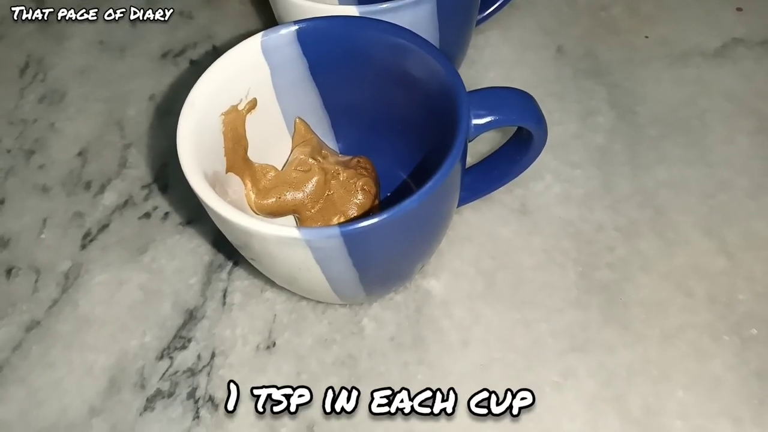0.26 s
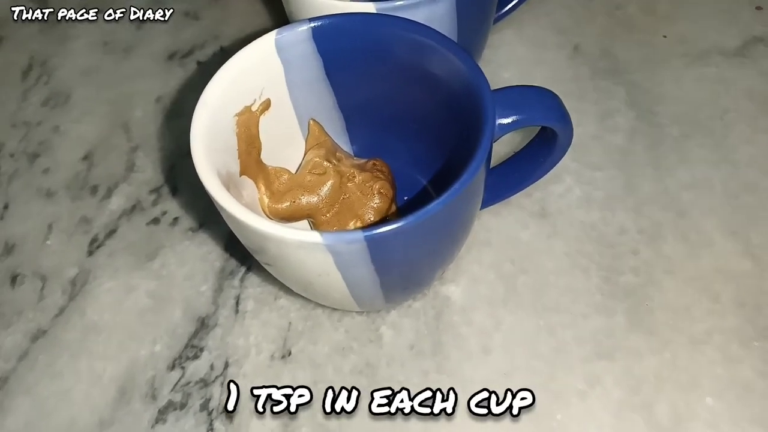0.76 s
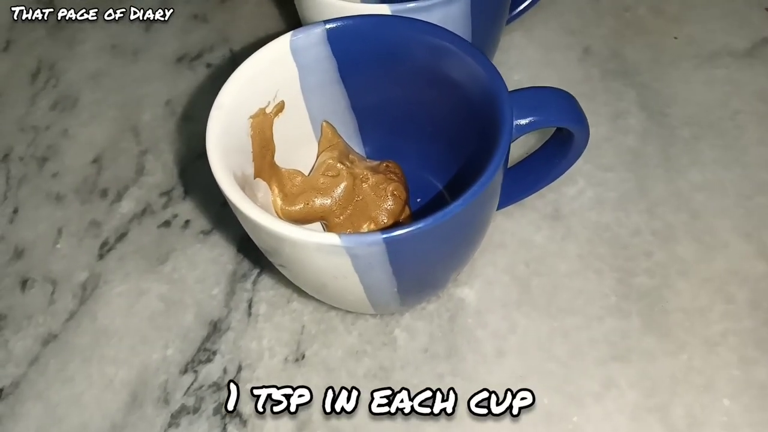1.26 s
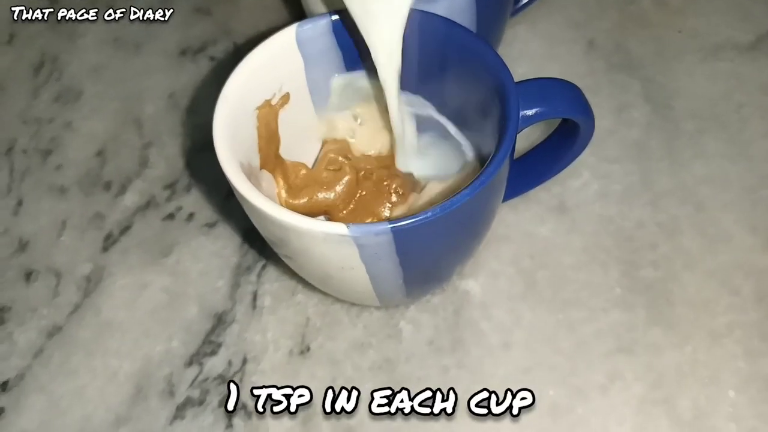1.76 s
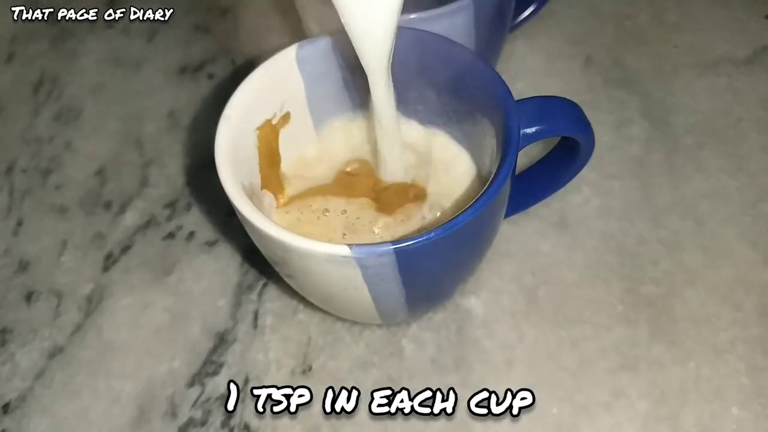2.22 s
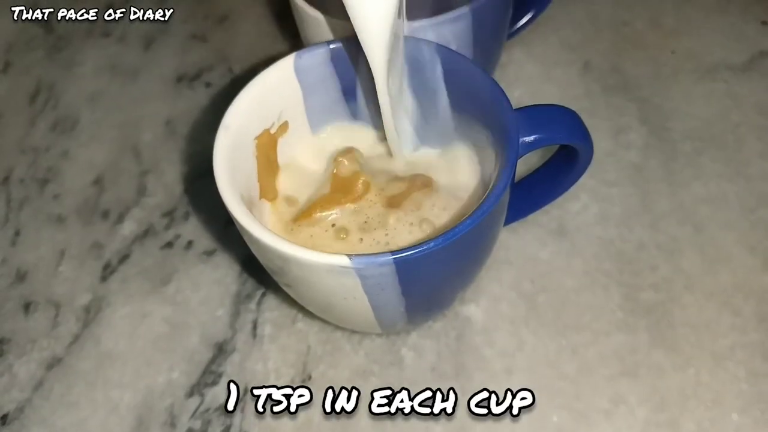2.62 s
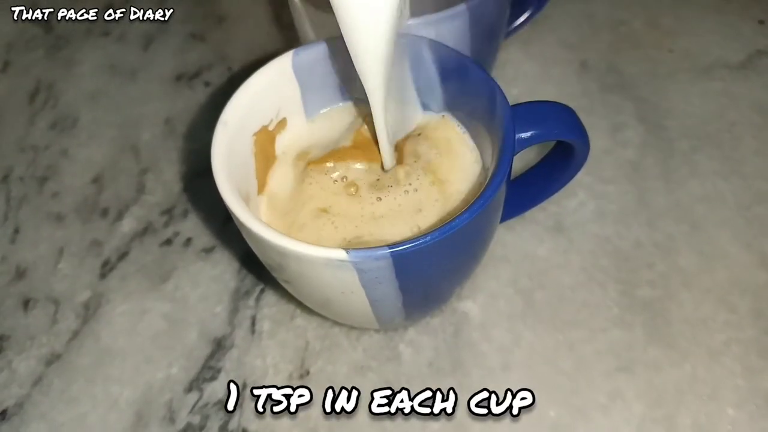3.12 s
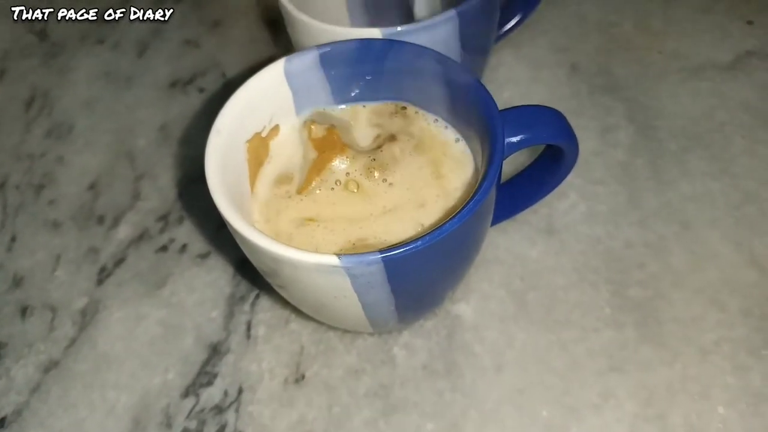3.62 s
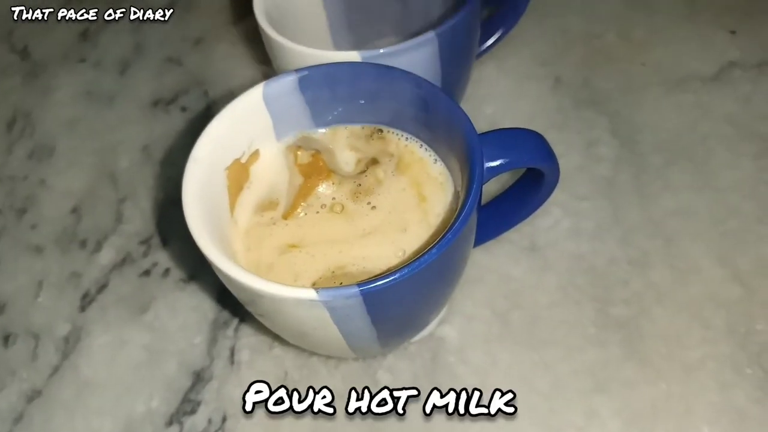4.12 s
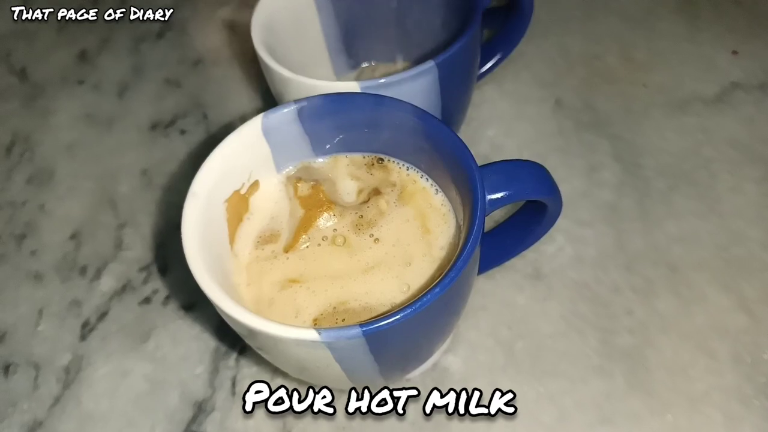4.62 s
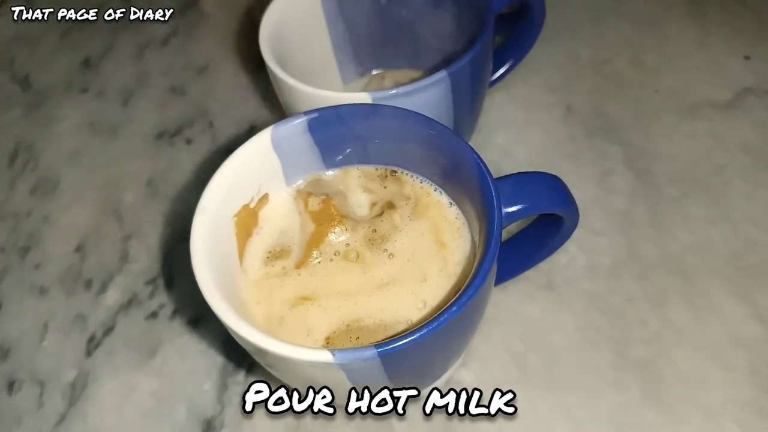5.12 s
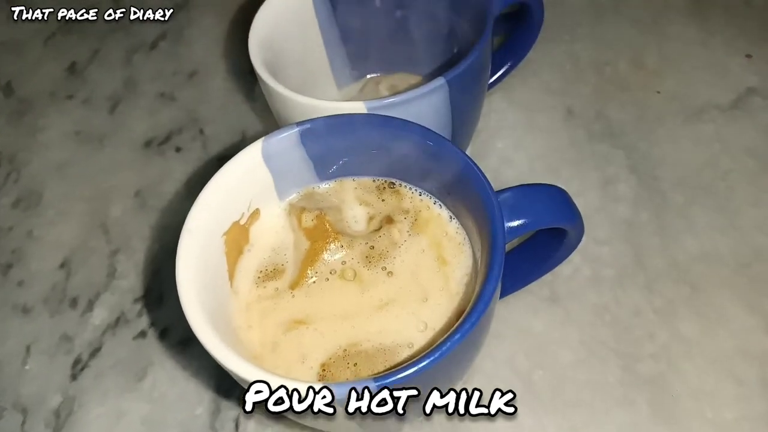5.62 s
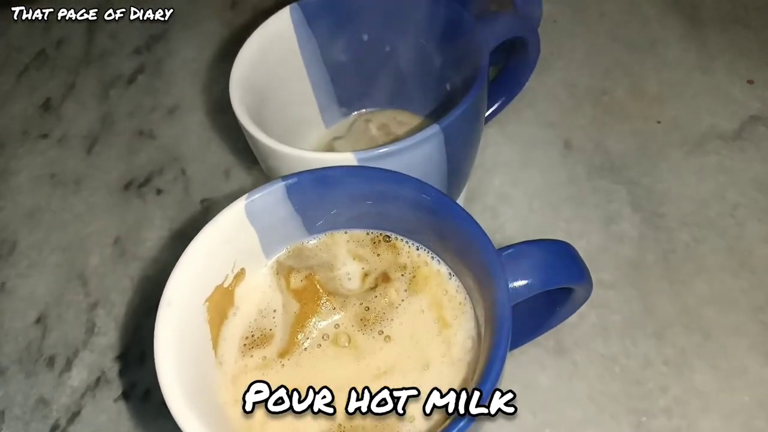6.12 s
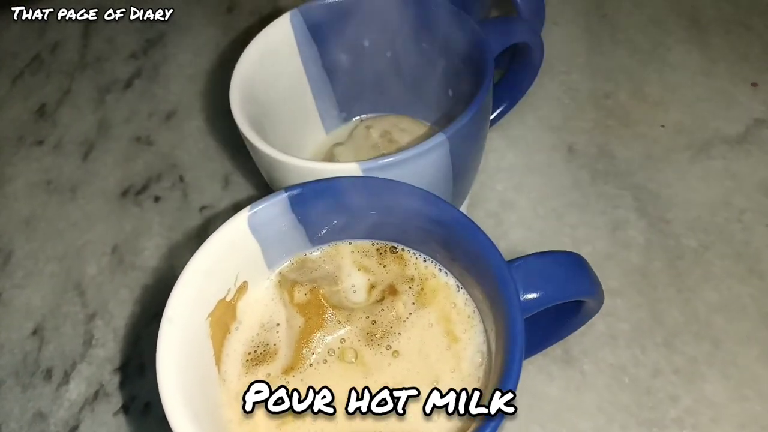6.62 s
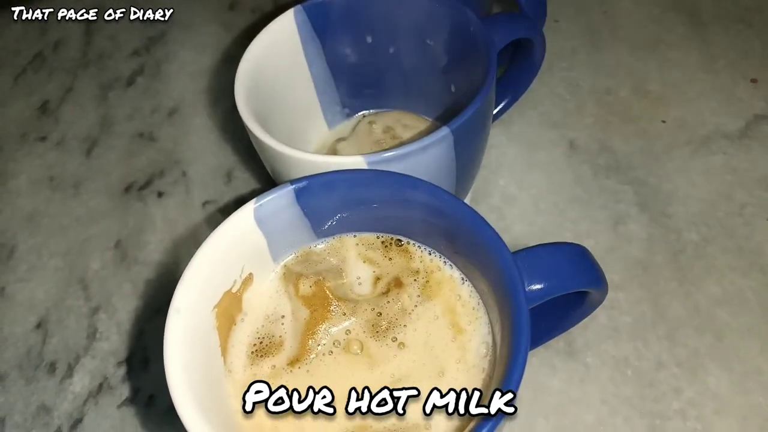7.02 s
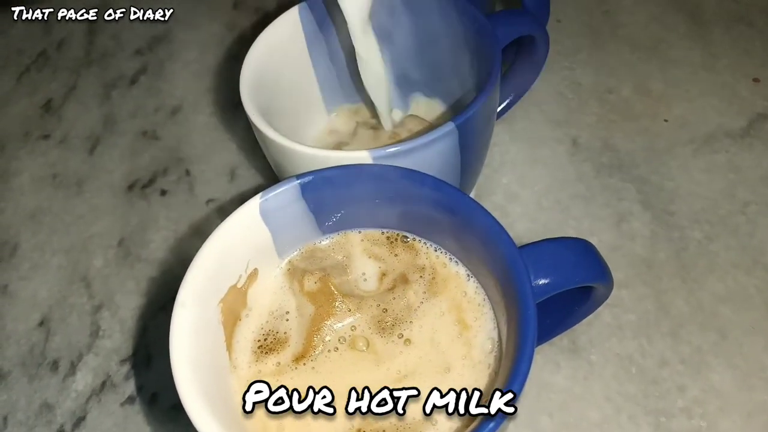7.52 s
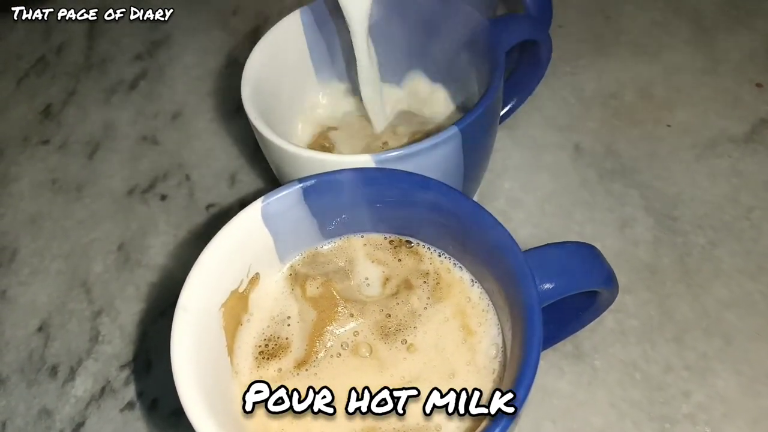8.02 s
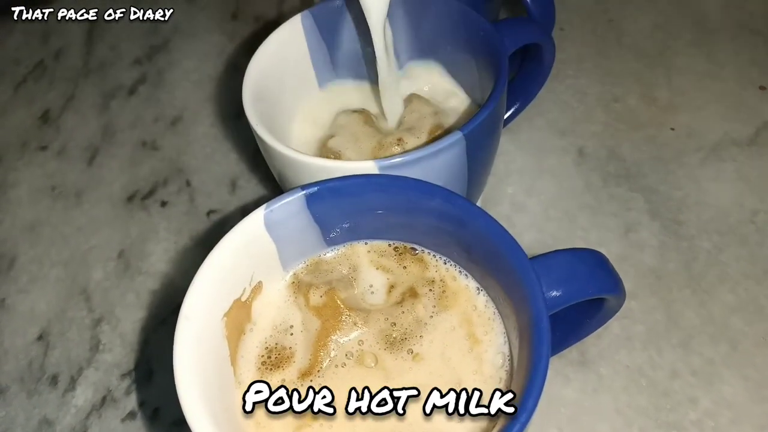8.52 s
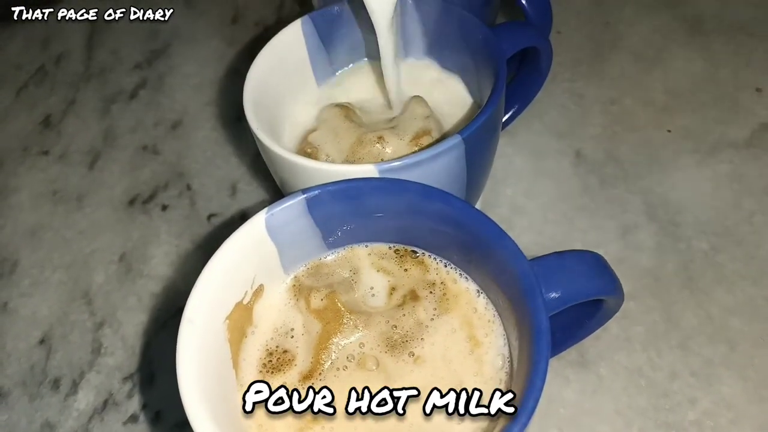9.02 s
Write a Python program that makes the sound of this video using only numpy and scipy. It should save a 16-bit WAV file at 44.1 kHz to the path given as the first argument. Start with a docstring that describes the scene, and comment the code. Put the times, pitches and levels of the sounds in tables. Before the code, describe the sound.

Hot milk seethes and trickles close to a handheld stereo phone in a small, hard-walled kitchen. From 0 to about 2 seconds a bright, even hiss lies over soft gurgles, a few pops and faint dull knocks, with a crackle and small splash near 0.8. Around 2.3 a tick and splash bring stronger bubbling, and chirping pops crowd together near 3. A hollow low knock swells at 3.5. From 4 to 6 seconds short gurgles rise and fall in pitch between tiny lulls, a sharp dry crack standing out at 5.5. Pops thicken from 6 to 7; at 7.1 comes a fuller splash with a dull thud and a short return of hiss. Bubbling continues to about 9.2, with bright pops around 8.2 and 9.1. Fine foam fizz, ringing droplets, fluttering low rumble and quiet room air persist throughout.

```python
"""A small, hard-walled kitchen, where hot milk seethes and trickles, heard by a phone's two microphones.
Bubbles pop as short chirps amid sprays of weaker ones; droplets splash, and clear bubbles ring on.
Filtered noise and tiny pings make the fizz of the foam; noise bursts make its ticks.
Under it a low rumble flutters in surges, dull knocks sound, and a bright hiss swells twice."""
import sys
import numpy as np
from scipy import signal
from scipy.fft import rfft, irfft, next_fast_len
from scipy.io import wavfile
from scipy.ndimage import uniform_filter1d

SR = 44100
rng = np.random.default_rng(int(sys.argv[2]) if len(sys.argv) > 2 else 0)


def bounce(signal):
    """Save signal as a 16-bit WAV file at the path given by the first command-line argument."""
    frames = np.transpose(np.atleast_2d(signal))
    limited = np.clip(frames, -1, 1)
    pcm = np.round(limited * 32767).astype(np.int16)
    wavfile.write(sys.argv[1], SR, pcm)


N = 408366
TIME = np.arange(N) / SR


def undb(db):
    """Decibels to gain."""
    return 10 ** (np.asarray(db) / 20)


def unit(x):
    """Scale to rms 1."""
    return x / np.sqrt(np.mean(x ** 2))


def add(out, start_s, sound):
    """Mix a sound into both channels at a given time."""
    i = max(int(start_s * SR), 0)
    n = max(min(sound.shape[-1], N - i), 0)
    out[:, i:i + n] += sound[..., :n]


def colour(x, rows):
    """Filter by a (Hz, dB) or (Hz, left dB, right dB) spectrum, interpolated over log frequency."""
    n = x.shape[-1]
    size = next_fast_len(n + 2048, True)
    hz, *sides = np.transpose(rows)
    log_f = np.log(np.arange(size // 2 + 1) * SR / size + 1)
    gain = undb(np.float32([np.interp(log_f, np.log(hz), db) for db in sides]))
    return irfft(rfft(np.float32(x), size) * gain, size)[:, :n]


def noise(rows, apart):
    """Coloured noise; apart is how much the two microphones differ."""
    shared = rng.standard_normal(N)
    return unit(colour(shared + apart * rng.standard_normal((2, N)), rows))


def walk(knots_per_s):
    """Random wander: normal knots of spread 1 joined by straight lines."""
    knots = rng.standard_normal(400)
    return np.interp(TIME * knots_per_s, np.arange(len(knots)), knots)


def swell(start_s, length_s, db, rise_s, fall_s):
    """Gain that rises, holds to the end of its length and dies away exponentially."""
    age = np.float32(TIME - start_s)
    fall = np.exp(-np.clip((age - length_s) / fall_s, 0, 20))
    return float(undb(db)) * np.clip(age / rise_s, 0, 1) * fall


# Large bubbles. Each row: start in seconds, relative level in dB, pitch in Hz,
# left minus right of the direct sound in dB.
LARGE_BUBBLES = [(0.039, -40, 2690, 34), (0.131, -47.5, 2300, -30), (0.237, -42, 2380, -20),
                 (0.569, -53.5, 2810, -8), (0.738, -48.5, 2300, 14), (0.946, -51, 2530, -6),
                 (1.174, -53, 3030, 1), (1.313, -57, 3400, 20), (1.566, -46.5, 3100, 11),
                 (1.645, -48, 2810, 13), (2.108, -50, 2180, -38), (2.346, -42, 2160, -20),
                 (2.519, -45.5, 2450, -34), (2.79, -50, 2550, -22), (2.893, -42.5, 2190, 31),
                 (2.968, -40.5, 1820, -12), (3.043, -42, 2585, -27), (3.225, -46.5, 3300, 13),
                 (3.333, -50.5, 2210, -21), (3.445, -61, 2930, -12), (3.494, -36, 2307, -19),
                 (3.663, -46.5, 2700, -3), (4.04, -39.5, 2600, -12), (4.219, -48.5, 2180, -25),
                 (4.49, -46, 3220, 0), (4.671, -39, 2650, -12), (4.705, -60, 1520, -4),
                 (4.733, -51, 2000, -20), (4.811, -42.5, 2670, -20), (5.034, -52, 3250, -16),
                 (5.31, -50, 2730, 19), (5.433, -53.5, 3480, -3), (5.801, -51.5, 2640, -17),
                 (6.021, -63, 1850, -2), (6.068, -44.5, 2920, 10), (6.086, -36, 2960, 13),
                 (6.222, -43, 2790, -2), (6.49, -41, 2650, 16), (6.532, -41, 1790, -14),
                 (6.595, -44, 2620, 43), (6.669, -45.5, 2650, -2), (6.748, -46.5, 2880, -10),
                 (6.81, -47.5, 2360, -26), (6.836, -50.5, 3020, -10), (6.959, -47, 2500, -3),
                 (7.032, -43, 3200, 2), (7.083, -47, 2100, 20), (7.121, -37.5, 2810, -18),
                 (7.129, -54, 1970, -11), (7.591, -58, 2760, -13), (7.691, -45.5, 2410, 20),
                 (7.756, -40, 3030, -7), (7.935, -45, 3200, -5), (7.994, -45, 2330, -1),
                 (8.088, -50.5, 3280, -19), (8.185, -37.5, 2046, 10), (8.203, -46, 2200, -6),
                 (8.421, -41, 2720, 11), (8.603, -42, 2760, 4), (8.647, -68, 2570, -6),
                 (8.762, -63, 3500, 8), (8.942, -44.5, 2200, 1), (9.012, -41.5, 2990, 4),
                 (9.029, -45, 3050, 10), (9.089, -36, 2370, -43)]


def pops(gain_db=4, snap_db=-7, snap_cycles=3.0, echo_db=-6, echo_s=0.0037,
         spray_db=-11, spray_s=0.018, spray_octaves=0.3, room_db=-5.5):
    """A large bubble's film snaps, its cavity rings and echoes off the wall, amid weaker bubbles."""
    cycles, t60_s = 3.8, .36
    out = np.zeros((2, N))
    sprays = rng.uniform(-1.1, 1, (len(LARGE_BUBBLES), 4, 3))
    for (start_s, db, hz, pan_db), spray in zip(LARGE_BUBBLES, sprays):
        size = undb(db + gain_db)
        cavity = bubble(hz, pan_db, cycles)
        snap = undb(snap_db) * bubble(hz, pan_db / 2, snap_cycles)
        add(out, start_s, size * (cavity + snap))
        add(out, start_s + echo_s, size * undb(echo_db) * bubble(hz, pan_db / 2, cycles))
        for late, pitch, side in spray:
            small = bubble(hz * 2 ** (spray_octaves * pitch), 8 * side - 2, cycles)
            add(out, start_s + spray_s * (0.93 + late), size * undb(spray_db) * small)
    return vessel(kitchen(out, room_db, t60_s, cross_db=-6.5))


LEFT_LAG_S = 0.00022  # bubbles reach the right microphone first


def bubble(hz, pan_db, cycles):
    """A bursting bubble: the opening cavity swells smoothly and rings for a few cycles."""
    t = np.maximum(np.arange(SR // 60) / SR - np.array([[LEFT_LAG_S], [0]]), 0)
    age = t * hz / cycles
    envelope = (age * np.exp(1 - age)) ** 2
    return envelope * np.sin(2 * np.pi * hz * t) * unit(undb([[pan_db / 2], [-pan_db / 2]]))


# Vessel resonances. Each row: frequency in Hz, relative level in dB.
VESSEL_MODES = [(1265, 15), (1641, 11.5), (1798, -24), (1912, 0.5), (2139, -2.5), (2579, -44), (2932, 3),
                (3527, -14), (3790, -4)]
# Spectrum of the vessel's mouth. Each row: frequency in Hz, left gain in dB, right gain in dB.
MOUTH_COLOUR = [(603, 6, -6), (1100, -9, 1), (1270, 13, 13), (1936, -7.5, -6.5), (1920, 8.5, 7),
                (2230, 1.5, -1), (2420, 6.5, 1.5), (3460, -3.5, 5.5), (3660, 11.5, 11.5), (4000, -8, 9.5),
                (4480, -4, 26), (5200, -18, 32), (9200, -22, -2)]


def vessel(x, ring_db=-5, t60_s=0.052):
    """The vessel's modes ring on after every bubble; its mouth colours the whole."""
    t = np.arange(SR // 8) / SR
    hz, db = np.transpose(VESSEL_MODES)[:, :, None]
    fade = undb(-60 * t / t60_s)
    modes = np.sum(undb(db) * np.cos(2 * np.pi * hz * t), axis=0)
    response = 2 * modes * fade / fade.sum()
    ringing = signal.oaconvolve(x, response[None], axes=1)[:, :N]
    return colour(x + undb(ring_db) * ringing, MOUTH_COLOUR)


PHONE_DRIFT_TURNS_PER_S = 0.1592  # the hand-held phone moves through the pattern of reflections


def kitchen(x, wet_db, t60_s, cross_db=-12):
    """Direct sound plus slowly shifting reflections off tiles and counter, which reach both microphones."""
    t = np.arange(SR // 3) / SR
    scatter = rng.standard_normal((2, 2, len(t))) * undb(-60 * t / t60_s) * (t > .003)
    scatter /= np.sqrt(np.sum(scatter ** 2, axis=2, keepdims=True))
    sent = np.float32(x + undb(cross_db) * np.roll(x[::-1], SR // 400, axis=1))
    here, there = (signal.oaconvolve(sent, np.float32(place), axes=1)[:, :N] for place in scatter)
    drift = np.float32(2 * np.pi * PHONE_DRIFT_TURNS_PER_S * TIME)
    return x + undb(wet_db) * (np.cos(drift) * here + np.sin(drift) * there)


# Gurgles, runs of small bubbles that glide in pitch. Each row: start in seconds, length in seconds,
# relative level in dB, first pitch in Hz, last pitch in Hz.
GURGLE_RUNS = [(0, 0.27, -46.5, 2676, 2530), (0.312, 0.14, -50.5, 2620, 2780),
               (0.681, 0.32, -49.5, 2660, 2690), (1.17, 0.2, -52.5, 3000, 3260),
               (1.4, 0.47, -52, 2770, 3040), (1.962, 0.049, -50, 2670, 1730),
               (2.062, 0.057, -47.5, 3060, 2290), (2.161, 0.026, -45.5, 3130, 3070),
               (2.241, 0.038, -50, 3030, 2720), (2.383, 0.09, -48, 3000, 2760),
               (2.521, 0.11, -50, 2500, 2950), (2.763, 0.035, -52, 2520, 2610),
               (3.14, 0.04, -52.5, 2760, 3740), (3.688, 0.024, -49.5, 2660, 2430),
               (3.797, 0.038, -45.5, 2680, 2460), (3.879, 0.085, -51.5, 3280, 2650),
               (3.994, .1, -47, 2380, 2520), (4.22, 0.035, -48, 2400, 2510), (4.3, 0.036, -48, 2830, 2480),
               (4.514, 0.08, -52, 3000, 2800), (4.601, 0.062, -44, 2760, 2430),
               (4.697, 0.079, -47.5, 2010, 2460), (4.817, 0.086, -48.5, 2750, 3000),
               (5.03, 0.04, -47, 2760, 2080), (5.071, 0.05, -53, 2560, 1980),
               (5.29, 0.074, -46, 2780, 2780), (5.488, 0.022, -42.5, 2650, 2220),
               (5.55, 0.042, -47, 2770, 2500), (5.713, 0.079, -52, 2520, 2570),
               (5.784, 0.193, -52, 2800, 2780), (6.004, 0.05, -44.5, 1930, 2510),
               (6.364, 0.084, -48.5, 3400, 2730), (6.659, 0.087, -51, 2460, 3140),
               (6.804, 0.057, -51, 2240, 2830), (7.225, 0.14, -52.5, 2580, 2760),
               (7.766, 0.049, -45.5, 3060, 2660), (7.889, 0.092, -46, 3140, 2800),
               (7.974, 0.084, -50, 2690, 2170), (8.072, 0.055, -65, 3170, 2400),
               (8.434, 0.031, -51, 2770, 2600), (8.6, 0.045, -42, 2500, 2440),
               (8.645, 0.051, -48.5, 3480, 3230), (9.108, 0.041, -46.5, 2430, 2420),
               (9.214, .06, -49, 2800, 2770)]
GURGLE_RISE_S, GURGLE_FALL_S = 0.006, 0.015
# Lulls of the simmer. Each row: start in seconds, length in seconds.
SIMMER_LULLS = [(1.843, 0.064), (2.64, 0.098), (4.932, 0.12), (5.616, 0.099), (3.72, 0.071), (7.397, 0.025),
                (7.616, 0.14), (8.303, 0.048), (8.75, 0.15)]
LULL_DB, LULL_EDGE_S = -10.5, 0.019
# small bubbles between gurgles, on the gurgles' level scale
SIMMER_DB, SIMMER_WANDER_DB, SIMMER_WANDERS_PER_S, SIMMER_HZ = -55.5, 3.5, 17, 2768
# small bubbles stirred up by a large one, relative to its table level
SWARM_DB, SWARM_RISE_S, SWARM_FALL_S = -2, 0.0027, 0.034


def bubbling():
    """Small bubbles' strength and pitch: simmer with lulls, gliding gurgles, swarms at large bubbles."""
    lull = sum(swell(start_s, length_s, 0, LULL_EDGE_S, LULL_EDGE_S) for start_s, length_s in SIMMER_LULLS)
    wander_db = SIMMER_WANDER_DB * walk(SIMMER_WANDERS_PER_S)
    power = undb(SIMMER_DB + LULL_DB * lull + wander_db) ** 2
    weighted_hz = power * SIMMER_HZ
    for start_s, length_s, db, first_hz, last_hz in GURGLE_RUNS:
        gurgle = swell(start_s, length_s, db, GURGLE_RISE_S, GURGLE_FALL_S) ** 2
        power += gurgle
        weighted_hz += gurgle * np.interp(TIME, [start_s, start_s + length_s], [first_hz, last_hz])
    for start_s, db, hz, _ in LARGE_BUBBLES:
        swarm = swell(start_s, SWARM_RISE_S, db + SWARM_DB, SWARM_RISE_S, SWARM_FALL_S) ** 2
        power += swarm
        weighted_hz += swarm * hz
    return np.sqrt(power), weighted_hz / power


BUBBLE_LOW_HZ, BUBBLE_HIGH_HZ = 1542, 4077


def seethe(strength, centre_hz, count=3000, octaves=0.306, cycles=5, spread_db=6, high_db=-2,
           gain_db=-2, room_db=2, t60_s=0.14):
    """Countless small bubbles around the pitch of the moment, weaker away from it, above all upwards."""
    out = np.zeros((2, N))
    starts_s = rng.uniform(0, (N - 1) / SR, count)
    chances = np.clip(rng.standard_normal((count, 3)), -2.2, 2.2)
    for start_s, (size, pitch, side) in zip(starts_s, chances):
        hz = centre_hz[int(start_s * SR)] * 2 ** (octaves * pitch)
        hz = np.clip(hz, BUBBLE_LOW_HZ, BUBBLE_HIGH_HZ) ** 2 / hz  # folded back into the range
        db = spread_db * size - .6 * pitch ** 2 + high_db * max(pitch, 0)
        add(out, start_s, undb(db) * bubble(hz, 5 * side - 3, cycles))
    out = vessel(kitchen(out, room_db, t60_s, cross_db=0.5))
    # even out chance crowding, so that the loudness follows the given strength
    crowding = np.sqrt(uniform_filter1d(np.mean(out ** 2, axis=0), size=SR // 28) + 1e-6)
    return out / crowding * strength * undb(gain_db)


# Splashes. Each row: start in seconds, length in seconds, relative level in dB,
# lowest pitch in Hz, highest pitch in Hz.
DROPLET_SPRAYS = [(0.127, 0.13, -65, 2600, 4100), (.835, 0.049, -48, 2700, 4200),
                  (2.302, 0.048, -44.5, 1570, 2450), (2.304, .11, -46.5, 3050, 4260),
                  (2.544, 0.045, -50, 2110, 3930), (3.157, .04, -52, 3300, 4600),
                  (4.611, 0.015, -44, 2400, 5100), (4.7, 0.065, -45.5, 1610, 3870),
                  (6.53, 0.023, -41, 2230, 3700), (7.113, 0.045, -40, 1740, 4600),
                  (7.169, 0.1, -50.5, 2300, 4070), (7.263, 0.019, -55, 1910, 4020)]
DROPS_PER_S = 1200


def splashes(gain_db=-8.5, cycles=1.6, spread_db=4, pan_db=-3, room_db=-1, t60_s=0.14):
    """Each splash throws a dense spray of droplets across its range of pitches."""
    out = np.zeros((2, N))
    chances = rng.uniform(0, 1, (len(DROPLET_SPRAYS), 250, 4))
    for (start_s, length_s, db, low_hz, high_hz), drops in zip(DROPLET_SPRAYS, chances):
        for k, (late, pitch, size, side) in enumerate(drops[:int(length_s * DROPS_PER_S)]):
            hz = low_hz * (high_hz / low_hz) ** pitch
            drop = bubble(hz, pan_db + 20 * (side - .5), cycles)
            drop_db = db + gain_db + 2 * spread_db * (2 * size - 0.5)
            add(out, start_s + (k + late) / DROPS_PER_S, undb(drop_db) * drop)
    return kitchen(out, room_db, t60_s)


# Clear ringing bubbles. Each row: start in seconds, relative level in dB, pitch in Hz,
# glide in octaves per second, t60 in seconds.
RINGING_BUBBLES = [(.94, -46, 2720, 1.2, 0.23), (2.391, -40, 2580, 2, 0.17), (2.546, -50, 2040, .3, 0.49),
                   (2.905, -43.5, 2220, -.5, 0.39), (3.221, -44, 3130, 0, 0.1), (3.225, -56, 2030, 0, 0.25),
                   (4.925, -56, 3620, .2, 0.44), (5.055, -48.5, 2126, -.2, 0.35),
                   (5.055, -49, 2830, -1, 0.11), (5.214, -48, 3030, 0, 0.18), (5.44, -56, 3670, .3, .25),
                   (7.045, -54, 3190, -.3, .25), (7.204, -53, 3850, 0, 1), (7.26, -47.5, 1670, .5, 0.2),
                   (7.338, -43, 2550, 1, .2), (8.25, -60, 1330, .4, 0.61), (8.446, -42, 2560, -.3, 0.22),
                   (8.945, -38.5, 1914, .3, 0.12), (9.16, -53, 3740, -.1, 0.28)]


def trickle(strength, count=420, low_hz=1850, high_hz=3900, gain_db=-52, spread_db=4,
            follow=1.0, glide=1.47, t60_s=0.1, clear_db=0):
    """Ringing bubbles stand out of the seething: a few strong, many faint ones that follow the flow."""
    out, flow = np.zeros((2, N)), unit(strength) ** follow
    for start_s, db, hz, octaves_per_s, ring_t60_s in RINGING_BUBBLES:
        add(out, start_s, undb(db + clear_db) * ring(hz, octaves_per_s, ring_t60_s, -2.9, 1.0))
    for k, (late, pitch, size, bend, side, lead) in enumerate(rng.uniform(-1.2, 1, (count, 6))):
        start_s = (k + .5 + late / 2) / count * (N - 1) / SR
        hz = np.sqrt(low_hz * high_hz) * (high_hz / low_hz) ** (pitch / 2)
        level = flow[int(start_s * SR)] * undb(gain_db + spread_db * size)
        add(out, start_s, level * ring(hz, glide * (bend + .5), t60_s, 10 * side, np.pi * lead))
    return out


RING_RISE_S, RING_WIDTH_HZ = 0.0099, 41


def ring(hz, octaves_per_s, t60_s, pan_db, lead_rad):
    """A trapped bubble rings on, gliding and wobbling as the milk jostles it; lead is right against left."""
    t = np.arange(SR // 4) / SR
    jostle = uniform_filter1d(rng.standard_normal(len(t)), size=128)
    wobble = np.sqrt(2 * np.pi * RING_WIDTH_HZ / SR) * jostle
    phase = np.cumsum(2 * np.pi * hz * 2 ** (octaves_per_s * t) / SR + wobble)
    fade = (1 - np.exp(-t / RING_RISE_S)) * undb(-60 * t / t60_s) * (1 - (t / t[-1]) ** 2)
    pan = unit(undb([[pan_db / 2], [-pan_db / 2]]))
    return fade * np.sin(phase + np.array([[0], [lead_rad]])) * pan


# Foam spectrum. Each row: frequency in Hz, left in dB, right in dB, relative.
FOAM_COLOUR = [(1500, -18.5, -19), (3320, -23, -17.5), (3800, -10.5, -4.5), (3950, -28, -11),
               (4840, -19, -9), (4875, -19, 1), (6500, -16, -0.5), (7680, -24, -2.5), (8240, -22, -12.5),
               (9330, -19, -31), (9400, -14, -37), (10000, -12, -43), (11570, -26.5, -33),
               (12500, -28, -27), (15300, -45, -36)]
FIZZ_DB = -52.5
FIZZ_FOLLOW = 0.13  # exponent on the bubbling strength


def fizz(strength, count=17000, low_hz=4300, high_hz=12200, flicker_db=1.5):
    """Tiny foam bubbles ping, each at its own pitch, in the soft wash of those too small to tell apart."""
    ring_s, spread_db, wash_db = .0009, 3.0, 4
    lag = np.arange(256)
    t = np.float32(lag / SR)
    hz = np.float32(rng.uniform(low_hz, high_hz, (count, 1)))
    size = undb(spread_db * np.minimum(rng.exponential(size=(count, 1)), 5))
    place = (rng.integers(0, N, (count, 1)) + lag).ravel()
    fade = size * (t / ring_s) ** .5 * np.exp(-t / ring_s)
    foam = []
    for turn in np.float32(rng.random((2, count, 1))):  # own phases at each microphone
        pings = fade * np.sin(2 * np.pi * (hz * t + turn))
        foam.append(np.bincount(place, pings.ravel(), N)[:N])
    wash = rng.standard_normal((2, N)) * undb(wash_db)
    foam = unit(colour(unit(np.array(foam)) + wash, FOAM_COLOUR))
    return foam * undb(FIZZ_DB + flicker_db * walk(25)) * unit(strength ** FIZZ_FOLLOW)


# Foam ticks. Each row: start in seconds, relative level in dB, relative level of the top treble in dB.
FOAM_TICKS = [(0.838, -31.5, -24), (2.3104, -33.5, -9), (3.218, -42, -9), (3.664, -41.5, -26),
              (4.277, -35, -40), (5.3107, -39, -46), (5.4884, -19, -12), (6.35, -30, -42),
              (7.752, -30.5, -33)]
# Spectra of crack and top treble. Each row: frequency in Hz, left in dB, right in dB, relative.
CRACK_COLOUR = [(1140, -26, -10), (2380, -4, 6.5), (4150, 5, 11.5), (5500, 11, 19), (7430, -4, 17),
                (9150, -34, -3), (9600, -17, -26), (15500, -26, -22)]
TREBLE_COLOUR = [(6000, -21, -31), (10100, 11, 4), (11800, 0, -3), (15500, -3, -1), (17000, -20, -20)]


def ticks(gain_db=-7, spark_db=-2, room_db=-3, t60_s=0.19):
    """Brief noise cracks; the sharpest reach far into the treble."""
    rise_s = .0015
    out, t = np.zeros((2, N)), np.arange(SR // 50) / SR
    envelope = t / rise_s * np.exp(1 - t / rise_s)
    grains = rng.standard_normal((len(FOAM_TICKS), 2, 2, len(t)))
    for (start_s, db, top_db), grain in zip(FOAM_TICKS, grains):
        spark = undb(top_db + spark_db) * unit(colour(grain[1], TREBLE_COLOUR))
        crack = unit(colour(grain[0], CRACK_COLOUR)) + spark
        add(out, start_s, undb(db + gain_db) * crack * envelope)
    return kitchen(out, room_db, t60_s)


# Dull knocks and low thuds. Each row: start in seconds, relative level in dB, centre in Hz,
# rise in seconds, t60 in seconds.
DULL_KNOCKS = [(.01, -57, 407, 0.0044, 0.46), (.1, -63, 640, 0.005, 0.78), (0.716, -53, 628, 0.004, 0.44),
               (.72, -59, 860, .006, 0.45), (.08, -64.5, 895, 0.011, 0.52), (.15, -61, 605, .008, 0.2),
               (0.226, -53, 282, .01, 0.2), (0.249, -62, 433, .01, 0.29), (0.324, -61, 430, .01, 0.19),
               (.405, -68, 680, .008, .25), (.515, -61, 596, 0.0087, 0.21), (.59, -60, 426, .01, 0.4),
               (0.709, -61, 288, 0.0087, 0.27), (0.716, -54, 432, .008, 0.29),
               (0.925, -60.5, 424, 0.018, 0.46), (1.049, -61.5, 424, .015, 0.61),
               (1.26, -61, 424, 0.037, 0.47), (1.451, -63, 457, .015, 0.17), (1.83, -62, 720, 0.0071, 0.4),
               (1.949, -48, 95, 0.024, 0.52), (1.985, -56, 580, 0.006, 0.25), (2.04, -57, 633, .006, 0.18),
               (2.849, -54, 87, 0.025, 0.85), (3.518, -36.5, 418, 0.15, 0.38),
               (4.648, -63.5, 917, .006, 0.78), (7.12, -46, 590, 0.028, 0.22),
               (7.119, -56, 1090, 0.021, 0.32), (8.101, -50, 86, 0.016, 0.28)]


def knocks(gain_db=2, width_hz=40):
    """Soft, ragged blows wake one low resonance each; the lowest are narrower and alike at both sides."""
    out, t = np.zeros((2, N)), np.arange(SR // 2) / SR
    chances = rng.standard_normal((len(DULL_KNOCKS), 3, len(t)))
    for (start_s, db, hz, rise_s, t60_s), chance in zip(DULL_KNOCKS, chances):
        push = chance[0] + hz / 450 * chance[1:]
        damping = np.exp(-np.pi * min(width_hz, hz / 6) * 2 * t)
        resonance = t * damping * np.sin(2 * np.pi * hz * t)
        body = unit(irfft(rfft(push) * rfft(resonance), len(t)))
        add(out, start_s, body * undb(db + gain_db - 60 * t / t60_s) * (1 - np.exp(-t / rise_s)))
    return out


# Rumble spectrum. Each row: frequency in Hz, relative level in dB.
LOW_COLOUR = [(25, -29), (55, -43), (85, -5.5), (120, -3), (155, 1), (185, -1), (240, -23), (400, -33),
              (700, -33.5), (1500, -99)]
# Rumble surges. Each row: start in seconds, length in seconds, level in dB.
RUMBLE_SURGES = [(0.026, 0.12, -53), (0.44, 0.051, -50.5), (0.642, 0.13, -49.5), (1.186, 0.072, -53),
                 (1.797, 0.09, -50), (1.957, 0.073, -54), (2.128, 0.064, -50), (2.34, 0.15, -52),
                 (2.607, 0.099, -54), (3.91, 0.23, -57), (4.576, 0.066, -48.5), (4.673, 0.2, -53),
                 (5.165, 0.079, -54.5), (5.496, 0.11, -51.5), (5.721, 0.046, -55.5), (6.75, 0.22, -58),
                 (6.893, 0.11, -46.5), (7.123, 0.044, -57.5), (7.34, 0.17, -56), (7.545, 0.4, -57.5),
                 (8.012, 0.065, -51), (8.135, 0.1, -53.5), (8.35, 0.092, -60), (8.898, 0.084, -56)]
SURGE_RISE_S, SURGE_FALL_S = 0.031, 0.019
# between surges it settles slowly
RUMBLE_START_DB, RUMBLE_REST_DB, RUMBLE_SETTLE_S = -57.5, -67, 3.7


def rumble(steady=0.8, pan_db=-1.5, lag_s=0.00024):
    """Low noise, partly evened, that comes in surges and reaches the left microphone a little later."""
    low = unit(colour(rng.standard_normal(N), LOW_COLOUR)[0])
    flutter = np.sqrt(uniform_filter1d(low ** 2, size=SR // 16) + 1e-6)
    settling_db = (RUMBLE_START_DB - RUMBLE_REST_DB) * np.exp(-TIME / RUMBLE_SETTLE_S)
    rest = undb(RUMBLE_REST_DB + settling_db)
    surge_power = sum(swell(*row, SURGE_RISE_S, SURGE_FALL_S) ** 2 for row in RUMBLE_SURGES)
    low = unit(low / flutter ** steady) * np.sqrt(rest ** 2 + surge_power)
    return np.array([np.roll(low, int(lag_s * SR)), low]) * undb([[pan_db / 2], [-pan_db / 2]])


# Hiss swells. Each row: start in seconds, length in seconds, relative level in dB.
HISS_SWELLS = [(-.08, 1.76, -50.5), (7.022, 0.3, -51)]
# Hiss spectrum. Each row: frequency in Hz, left in dB, right in dB, relative.
BRIGHT_COLOUR = [(250, -34, -27), (330, -37, -31), (467, -1, -5), (520, -41, -30), (800, -31, -38),
                 (1130, -40, -42), (1310, -3, -6), (1520, -3.5, 6.5), (1940, 5, -1.5), (2490, 2.5, 5.5),
                 (4100, 6, 9), (3980, 1, -3), (4900, -1, 2), (5450, -2, -2.5), (7400, -5, 12),
                 (8980, -5.5, -3), (9930, 8, -5.5), (11800, 0.5, -2), (14500, 2, 1.5)]
HISS_RISE_S, HISS_FALL_S_PER_S = 0.18, 0.26  # a longer swell takes longer to die away


def hiss(gain_db=2.5):
    """Bright noise that swells, holds almost evenly and fades."""
    wander_db = 1.0
    strength = sum(swell(start_s, length_s, db, HISS_RISE_S, HISS_FALL_S_PER_S * length_s)
                   for start_s, length_s, db in HISS_SWELLS)
    return noise(BRIGHT_COLOUR, 4.0) * strength * undb(gain_db + wander_db * walk(15))


# Spectrum of the kitchen's air. Each row: frequency in Hz, left in dB, right in dB, relative.
ROOM_COLOUR = [(25, -8, -28), (80, -1, -5), (161, -12, -14), (234, -8.5, 1), (327, 10.5, 5.5),
               (364, -8, 0.5), (444, 7.5, 2), (522, -7, -4), (535, -2, 1), (895, -13, -8), (888, -8, 14),
               (914, -14, -13.5), (1880, -1.5, -1.5), (3600, -11, -18), (13300, -20.5, -31)]
# Its mean level, which dips briefly early on. Each row: time in seconds, level in dB.
ROOM_LEVEL = [(.1, -65), (.8, -69.5), (1.05, -73), (1.65, -71.5), (2.1, -64), (3.4, -65), (4.2, -67),
              (7, -65.5), (9.2, -65)]


def kitchen_air():
    """Steadily coloured noise of the kitchen's air, its level wandering."""
    level_db = np.interp(TIME, *np.transpose(ROOM_LEVEL))
    return noise(ROOM_COLOUR, 0.65) * undb(level_db + 4.4 * walk(9.8))


def scene():
    """Milk, knocks, rumble, hiss and the air of the kitchen."""
    strength, centre_hz = bubbling()
    milk = pops() + seethe(strength, centre_hz) + splashes() + trickle(strength)
    foam = fizz(strength) + ticks()
    return milk + foam + knocks() + rumble() + hiss() + kitchen_air()


TOP_HZ = 15800


def record(dry):
    """The phone cuts the top: a steep elliptic low-pass."""
    return signal.sosfilt(signal.ellip(10, .2, 70, TOP_HZ, fs=SR, output="sos"), dry)


dry = scene()
out = record(dry)
bounce(out)
```